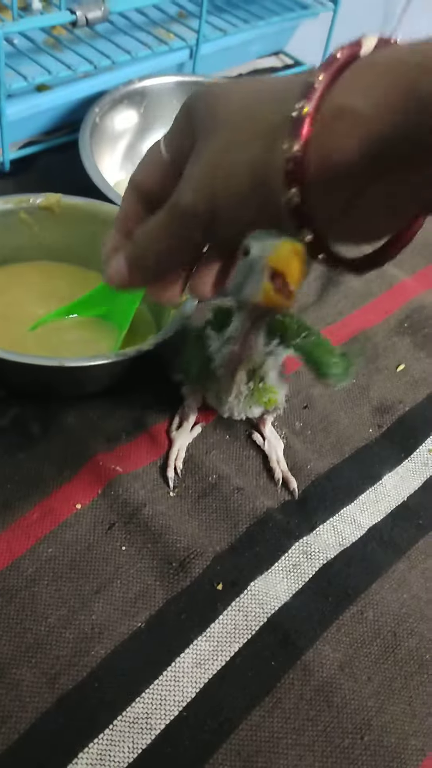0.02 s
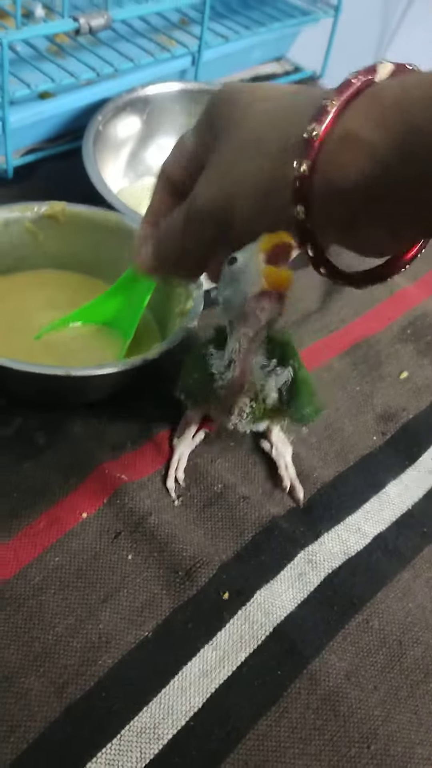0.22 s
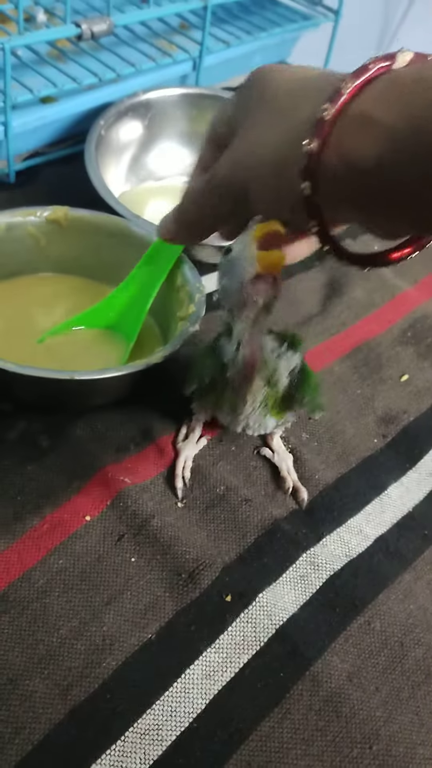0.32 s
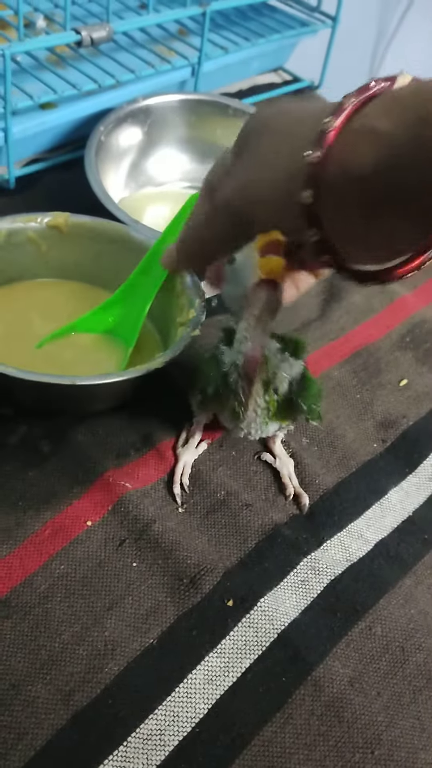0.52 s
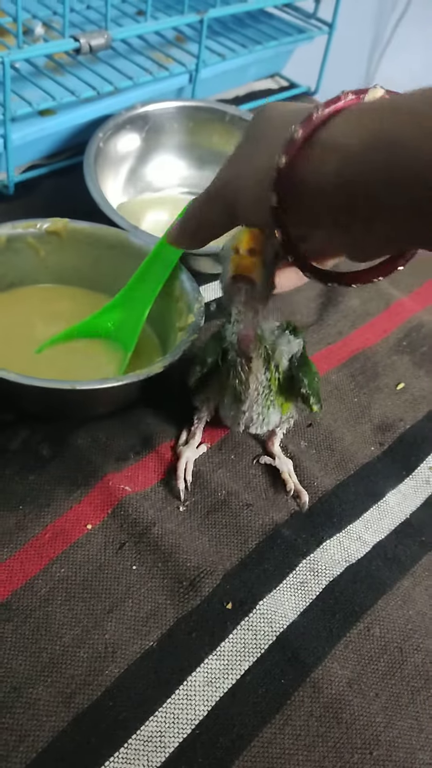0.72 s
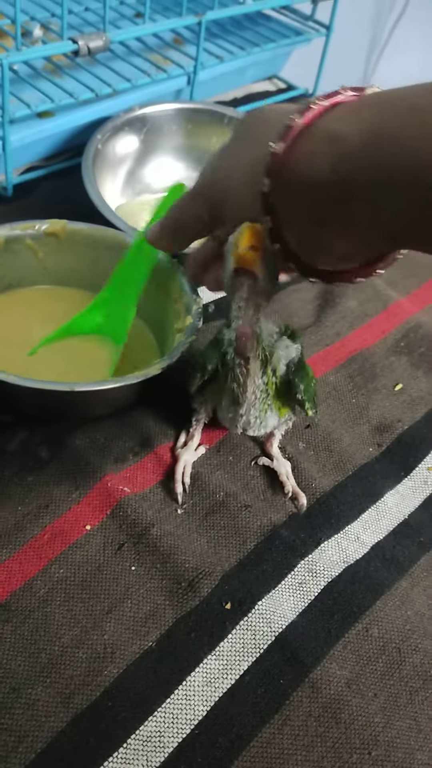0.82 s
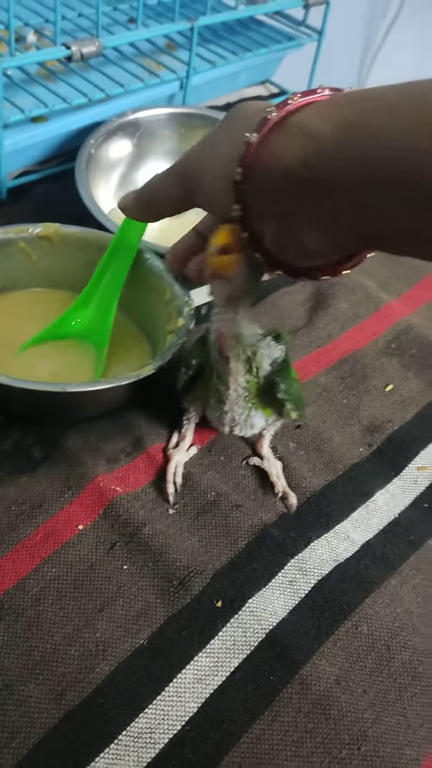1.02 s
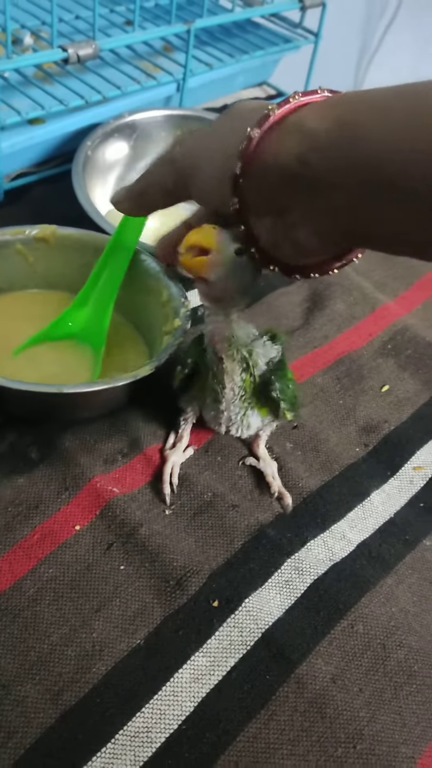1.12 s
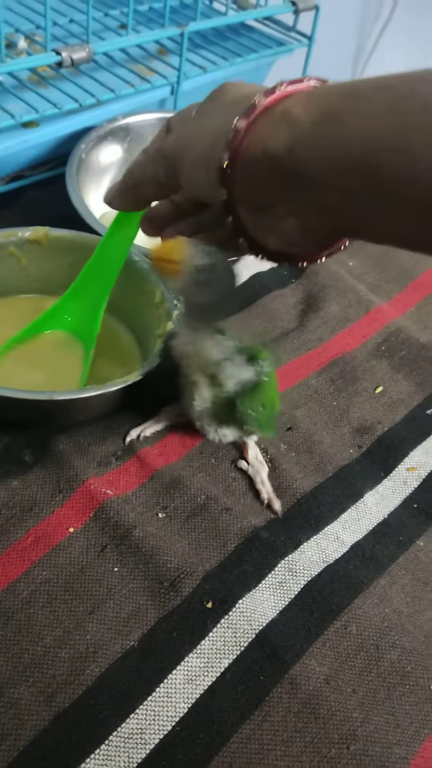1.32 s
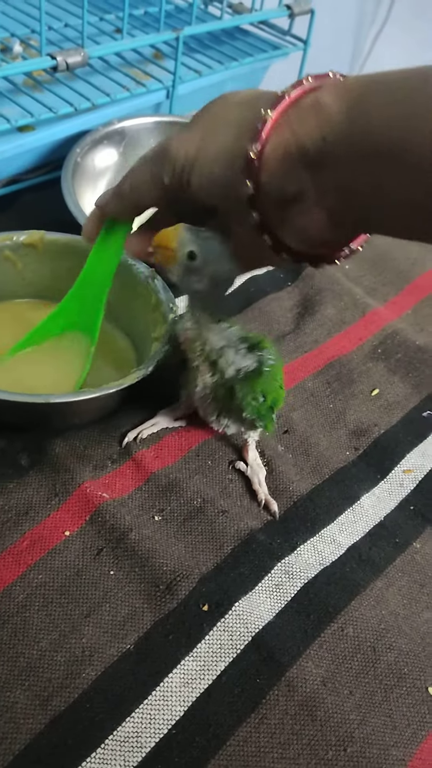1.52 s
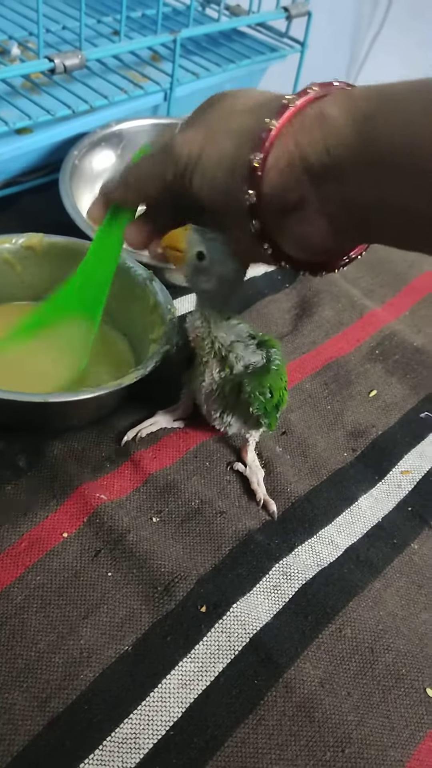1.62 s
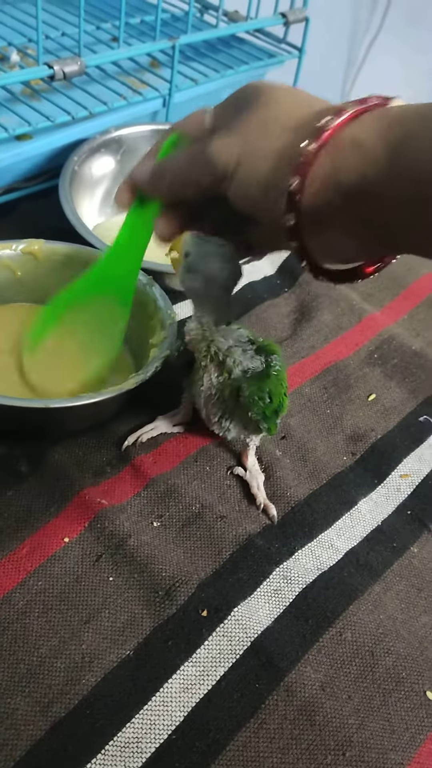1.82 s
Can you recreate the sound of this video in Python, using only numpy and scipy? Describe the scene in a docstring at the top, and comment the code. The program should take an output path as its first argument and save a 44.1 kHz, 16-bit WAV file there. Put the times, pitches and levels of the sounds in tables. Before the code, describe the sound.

Two scratchy, high baby parrot squawks sweep upward and flip down, about a second apart, indoors

```python
"""A parrot chick begs twice, close by in a small room.
Each cry adds harmonics, half-pitch tones and puffs of noise. It starts as a rasp, clears as its
pitch climbs and ends in a quick downward flip; half-pitch tones break through in the first.
Beak ticks, made of shaped noise, come before the cries, and random echoes make the room.
Soft low noise bumps, a faint wavering drone and steady room noise lie underneath."""
import sys
import numpy as np
from scipy import signal
from scipy.fft import rfft, irfft, next_fast_len
from scipy.io import wavfile

SR = 44100
rng = np.random.default_rng(int(sys.argv[2]) if len(sys.argv) > 2 else 0)


def pcm_store(signal):
    """Save signal as 16-bit PCM."""
    levels = np.round(np.clip(np.atleast_2d(signal), -1, 1) * 32767)
    wavfile.write(sys.argv[1], SR, levels.astype(np.int16).T)


N = 83790  # length in samples

# Path of each cry: t/s, pitch f/Hz, level/dB before echoes and balance, roughness/dB (0 dB means half rough), #
# half-pitch tones level/dB, throat resonance level/dB
FIRST_CRY = [(.203, 1105, -35, 7.5, -26, -9), (.24, 1199, -30, 5.5, -20, 2.5), (.258, 1235, -26.5, 2, 0, 1),
             (.288, 1330, -25, 3, -10, 10), (.318, 1375, -21.5, -3, -14, 15),
             (.342, 1400, -21, -3, -14, 15), (.362, 1435, -24.5, -3, -10, 12), (.383, 1560, -28, -1, -8, 9),
             (.392, 1670, -27.5, -3, 3, 5), (.41, 1740, -26.5, -7, 2, 7), (.456, 1845, -28, -15, 1, 8),
             (.472, 1993, -30.5, -11.5, -36, 5.5), (.481, 1757, -36, 1.5, -21, 32),
             (.488, 1110, -32, -7.5, -18, 2), (.496, 635, -28.5, -14, 3, 10)]
SECOND_CRY = [(1.064, 977.7, -33, 4.5, -3, 15), (1.08, 1086, -25, 1.5, -8, 8),
              (1.107, 1180, -25, -2, -10, 5), (1.14, 1275, -29, -5, -9, 1),
              (1.165, 1380, -32.5, -8, -14, -1), (1.2, 1610, -31, -27.5, -17, 0),
              (1.225, 1715, -29.5, -41, -31, -18), (1.267, 1813, -33.5, -26, -33, 7),
              (1.272, 1940, -30.5, -2, -5, 1), (1.283, 2050, -28.5, -12, -9, 7),
              (1.293, 2155, -31, -17, -13, -9), (1.301, 2044, -35.5, -8.5, -9, 5),
              (1.31, 1085, -25.5, -8.5, -17, -2), (1.316, 749, -32.5, -9, 4, 22)]
# Strength of a partial by its frequency, only the shape counts: f/Hz, level/dB
FIRST_COLOUR = [(650, -4), (1300, -9), (1800, 6), (2300, -11), (2700, -12), (3500, -12), (4500, -1.5),
                (5450, -14), (6200, -12), (8200, -20), (9600, -45), (12000, -27)]
SECOND_COLOUR = [(650, 25), (1250, -11), (1800, 3), (2500, 5), (3500, 1), (4400, 3), (5300, -4), (6500, -3),
                 (7600, -15), (11000, -39.5), (13200, -27)]
# Shape of the rasp noise: f/Hz, level/dB
FIRST_RASP = [(450, -38), (800, -12), (1750, 0), (2250, -6.5), (2600, 3), (3000, -3.5), (3700, -1),
              (4400, 4), (5700, -6.5), (7000, -2), (8200, -23), (9500, -61.5), (11200, -16), (14000, -29)]
SECOND_RASP = [(450, -18.5), (850, -1.5), (2300, -9), (2850, -35), (3350, 3), (4500, 17), (5600, -23),
               (6900, 7), (7900, -30), (11500, -13), (13200, 0)]
# The beak opens before each cry: t/s, level/dB before echoes and balance, length/s
BEAK_TICKS = [(.187, -48.5, 0.00072), (1.018, -59.5, 0.0054)]
# Shape of the tick noise: f/Hz, level/dB
TICK_COLOUR = [(1200, -18), (3200, 4), (7500, 8), (10000, -3.5)]
# Sharp catches in the rasp of the second cry: t/s, level/dB before echoes and balance, length/s
CATCHES = [(1.081, -29, 0.00049), (1.119, -21.5, 0.00023), (1.1303, -20.5, 0.001)]
# Left minus right for the bird, before its pan is added: f/Hz, level/dB
BALANCE = [(900, -3), (1800, 2.5), (2900, -4.5), (4300, -9), (5300, -16.5), (6400, -8.5), (7300, 3.5),
           (8500, 9), (11000, -7), (14000, 2.5)]
# Shape of the room's answer, before ROOM_DB is added: f/Hz, level/dB
ROOM_COLOUR = [(500, -12), (1800, -5.5), (3300, -0.5), (4400, -5.5), (6000, -3), (14000, 1.5)]
# Soft bumps of handling and moving air: t/s, level/dB on the left, length/s
BUMPS = [(.02, -28.5, 0.031), (.14, -36.5, 0.028), (.222, -29.5, 0.017), (.375, -39.5, 0.028),
         (.597, -27.5, 0.013), (.618, -31.5, 0.014), (.675, -32.5, 0.01), (.73, -39.5, 0.029),
         (.97, -43, 0.19), (1.35, -44, 0.054), (1.785, -38, .014)]
# Shape of the bump noise: f/Hz, level/dB
BUMP_COLOUR = [(20, -8), (65, -9), (120, -15), (200, -21), (320, -33), (700, -45.5), (2000, -77)]
# Shape of the steady room noise: f/Hz, level/dB
FLOOR_COLOUR = [(15, -36), (25, 7), (120, -3.5), (210, -1.5), (297, -5.5), (680, -16.5), (818, -9.5),
                (1190, -17.5), (2130, -21), (2710, -29), (4870, -31), (14500, -51.5)]
# The low drone swells briefly: t/s, peak level/dB, length/s
DRONE_SWELLS = [(.19, -44.5, 0.059)]

FLOOR_DB, FLOOR_LIKENESS = -47.5, 0.17  # likeness: share of power common to both sides
BUMP_RIGHT_DB = -23  # right against left
DRONE_HZ = 197.6
ATTACK_S, RELEASE_S = 0.00382, 0.0018
THROAT_HZ, THROAT_WIDTH_HZ = 4353, 820
# pitch scatter at full roughness (share), its speed, and the steady unsteadiness (share)
JITTER, JITTER_PER_S, WAVER = 0.028, 230, 0.003
# in the rasp each partial staggers on its own, in level and phase
FLUTTER_DB, FLUTTER_RAD, FLUTTER_PER_S = 3.5, 0.8, 230
SPUTTER_DB, SPUTTER_PER_S = 2, 550  # the level sputters in the rasp
NOISE_SHARE = 0.6  # share of noise power at full roughness
RASP_SPREAD = 0.64  # share of the rasp noise that reaches the two sides unalike
PUFF_DEPTH = 0.41
FIRST_PAN_DB, SECOND_PAN_DB = 1, 2  # added to the balance, left minus right
FIRST_LAG_S, SECOND_LAG_S = 0.00024, 0.00019  # right side's delay; the head turns between cries
ROOM_DB, ROOM_T60_S, ROOM_GAP_S = -9.5, 0.33, 0.00086
NEAR_DB, NEAR_T60_S = -9, 0.025  # early echoes
CUTOFF_HZ = 14200


def from_db(db):
    """Turn decibels into gain."""
    return 10 ** (np.asarray(db) / 20)


def rms_one(x):
    """Scale a signal to an average (rms) strength of 1."""
    return x / np.sqrt(np.mean(x ** 2) + 1e-20)


def at_hz(points, hz):
    """Read a level curve, joining its points on a log-frequency axis."""
    f, db = np.transpose(points)
    return np.interp(np.log(np.maximum(hz, 1)), np.log(f), db)


def filtered(x, response):
    """Filter by multiplying the spectrum with a function of frequency."""
    size = next_fast_len(2 * N)
    hz = np.arange(size // 2 + 1) * SR / size
    return irfft(rfft(x, size) * response(hz), size)[..., :N]


def noise(spectrum):
    """Shape white noise with a level curve, then scale it to rms 1."""
    return rms_one(filtered(rng.standard_normal(N), lambda hz: from_db(at_hz(spectrum, hz))))


def drift(rate):
    """Smooth random motion of rms 1: white noise through a two-step low-pass."""
    r = np.exp(-2 * np.pi * rate / SR)
    # a short run-in lets the filter settle
    motion = signal.lfilter([1], [1, -2 * r, r * r], rng.standard_normal(N + SR // 10))
    return rms_one(motion[-N:])


def swells(rows):
    """Add up short bell-shaped loudness curves."""
    t = np.arange(N) / SR
    return sum(from_db(db) * np.exp(-.5 * ((t - s) / length) ** 2) for s, db, length in rows)


def room_noise():
    """Steady shaped noise, partly alike on the two sides."""
    shared = noise(FLOOR_COLOUR)
    sides = np.array([noise(FLOOR_COLOUR), noise(FLOOR_COLOUR)])
    mix = np.sqrt(FLOOR_LIKENESS) * shared + np.sqrt(1 - FLOOR_LIKENESS) * sides
    return from_db(FLOOR_DB) * mix


def low_drone():
    """A sine with a wandering pitch that swells briefly."""
    pitch = DRONE_HZ * (1 + 0.05 * drift(18))
    return swells(DRONE_SWELLS) * np.sin(2 * np.pi * np.cumsum(pitch) / SR)


def soft_bumps():
    """Short swells of low noise from handling and moving air, mostly on the left."""
    sides = np.array([noise(BUMP_COLOUR), from_db(BUMP_RIGHT_DB) * noise(BUMP_COLOUR)])
    return swells(BUMPS) * sides


def echoes(x, t60, gap):
    """Dense random reflections that die by 60 dB in t60 seconds, different on each side."""
    t = np.arange(N) / SR
    tail = rng.standard_normal((2, N)) * from_db(-60 * t / t60) * (t > gap)
    tail /= np.sqrt((tail ** 2).sum(1, keepdims=True))
    return signal.fftconvolve(x, tail, axes=1)[:, :N]


def placed(x, pan_db, lag_s):
    """The left side hears the bird first; the right one favours the throat band."""
    def half_balance(hz):
        return (at_hz(BALANCE, hz) + pan_db) / 2

    def right_response(hz):
        return from_db(-half_balance(hz)) * np.exp(-2j * np.pi * hz * lag_s)

    left = filtered(x[0], lambda hz: from_db(half_balance(hz)))
    return np.array([left, filtered(x[1], right_response)])


def syrinx_tone(pitch, phase, half_db, throat_db, rough, on, colour):
    """The bird's voice box gives harmonics and half-pitch tones, shaped by the throat."""
    k = np.arange(2, 28)[:, None]  # steps of half the pitch; odd ones are the half-pitch tones
    hz = k / 2 * pitch[on]
    throat = throat_db[on] / (1 + ((hz - THROAT_HZ) / THROAT_WIDTH_HZ) ** 2)
    gains = from_db(at_hz(colour, hz) + k % 2 * half_db[on] + throat)
    gains /= np.sqrt((gains ** 2).sum(0) / 2)  # the path alone sets the loudness
    stagger = np.array([[drift(FLUTTER_PER_S)[on] for _ in k] for _ in range(2)])
    level_stagger, phase_stagger = stagger * np.sqrt(rough[on])
    gains *= from_db(FLUTTER_DB * (np.clip(level_stagger, -2, 2) - .5 * rough[on]))
    tone = np.zeros(N)
    tone[on] = (gains * np.cos(k / 2 * phase[on] + FLUTTER_RAD * phase_stagger)).sum(0)
    return tone


def rasp_noise(phase, sputter, rasp_colour):
    """Air noise comes in uneven puffs, one per pitch cycle, then gets its colour."""
    shared, sides = rng.standard_normal(N), rng.standard_normal((2, N))
    air = np.sqrt(1 - RASP_SPREAD) * shared + np.sqrt(RASP_SPREAD) * sides
    puffs = air * (1 + PUFF_DEPTH * np.cos(phase)) * sputter
    return rms_one(filtered(puffs, lambda hz: from_db(at_hz(rasp_colour, hz))))


def cry(rows, colour, rasp_colour):
    """One cry follows its path and trades clear tone for rasp as the roughness changes."""
    t = np.arange(N) / SR
    s, *columns = np.transpose(rows)
    pitch, level_db, rasp_db, half_db, throat_db = [np.interp(t, s, c) for c in columns]
    rough = 1 / (1 + from_db(-rasp_db) ** 2)  # 0 is clear, 1 is fully rough
    scatter = (WAVER + JITTER * np.sqrt(rough)) * drift(JITTER_PER_S)
    phase = 2 * np.pi * np.cumsum(pitch * (1 + scatter)) / SR
    fade_in = np.clip((t - s[0]) / ATTACK_S + 1, 0, 1)
    fade_out = np.clip((s[-1] - t) / RELEASE_S + 1, 0, 1)
    gate = fade_in * fade_out
    tone = syrinx_tone(pitch, phase, half_db, throat_db, rough, gate > 0, colour)
    sputter = from_db(SPUTTER_DB * np.sqrt(rough) * np.clip(drift(SPUTTER_PER_S), -2, 2))
    rasp = rasp_noise(phase, sputter, rasp_colour)
    noisy = rough * NOISE_SHARE
    voice = np.sqrt((1 - noisy) * sputter) * tone + np.sqrt(noisy) * rasp
    return gate * from_db(level_db) * voice


def chick():
    """Two cries with beak ticks and catches, early echoes off the bowls, and the room's answer."""
    first = cry(FIRST_CRY, FIRST_COLOUR, FIRST_RASP)
    first += swells(BEAK_TICKS) * noise(TICK_COLOUR)  # holds the ticks of both cries
    second = cry(SECOND_CRY, SECOND_COLOUR, SECOND_RASP)
    second += swells(CATCHES) * noise(SECOND_RASP)
    direct = placed(first, FIRST_PAN_DB, FIRST_LAG_S) + placed(second, SECOND_PAN_DB, SECOND_LAG_S)
    reflections = echoes(direct, ROOM_T60_S, ROOM_GAP_S)
    room = filtered(reflections, lambda hz: from_db(ROOM_DB + at_hz(ROOM_COLOUR, hz)))
    early = from_db(NEAR_DB) * echoes(direct, NEAR_T60_S, 0)
    return direct + room + early


def scene():
    """Sound waves add: room noise, drone and bumps, with the chick on top."""
    return room_noise() + low_drone() + soft_bumps() + chick()


def record(dry):
    """A steep low-pass removes the highest treble."""
    low_pass = signal.ellip(10, .2, 80, CUTOFF_HZ, fs=SR, output="sos")
    return signal.sosfilt(low_pass, dry)


dry = scene()
out = record(dry)
pcm_store(out)
```